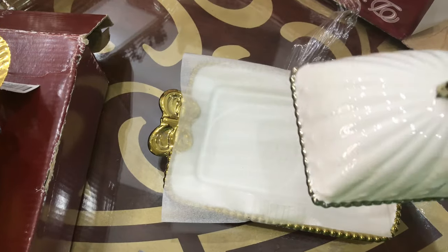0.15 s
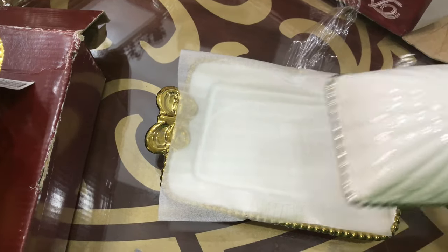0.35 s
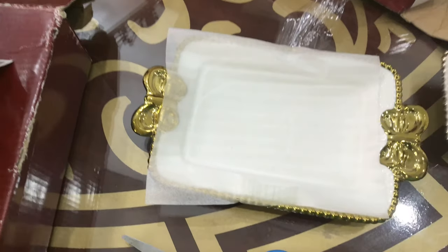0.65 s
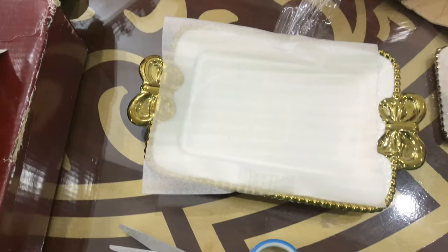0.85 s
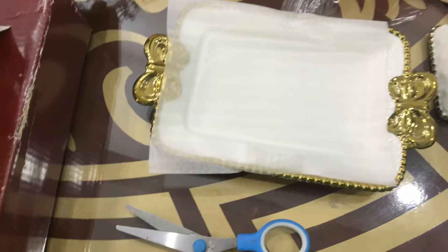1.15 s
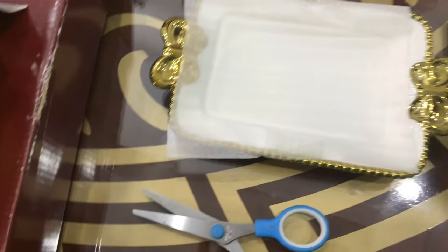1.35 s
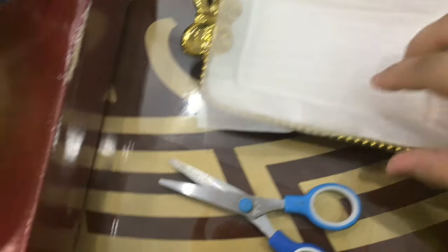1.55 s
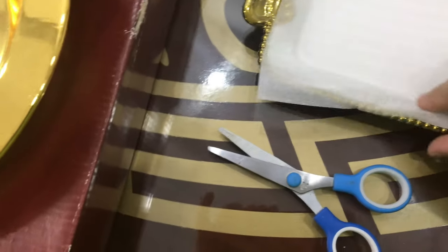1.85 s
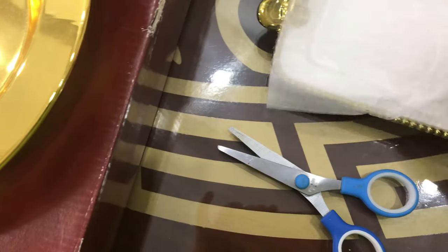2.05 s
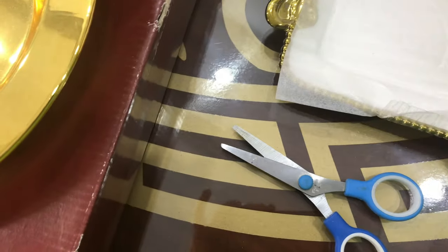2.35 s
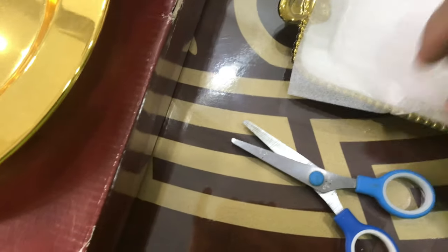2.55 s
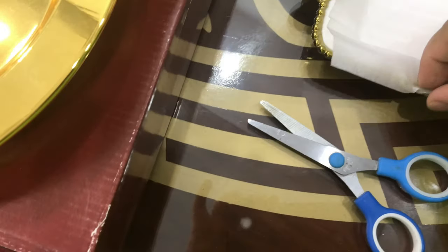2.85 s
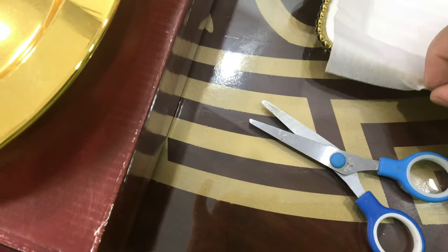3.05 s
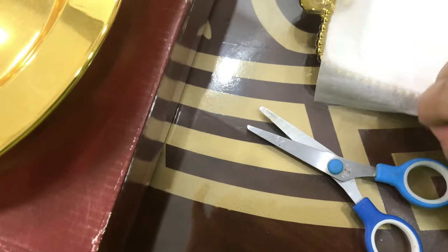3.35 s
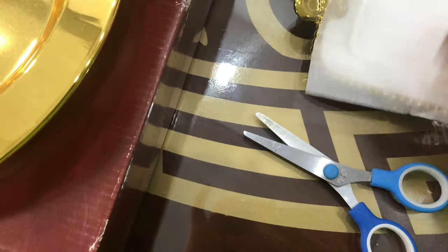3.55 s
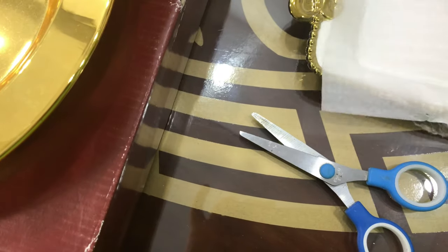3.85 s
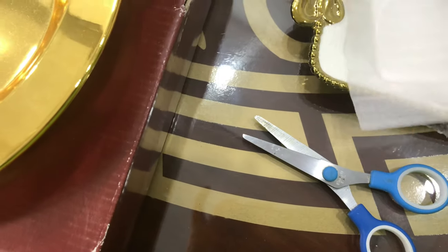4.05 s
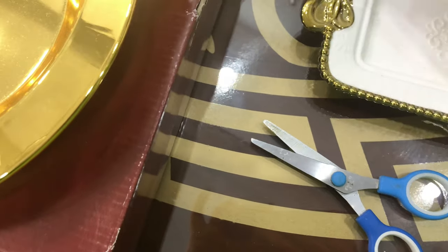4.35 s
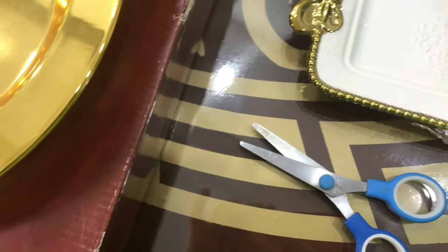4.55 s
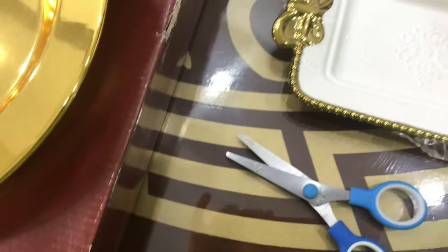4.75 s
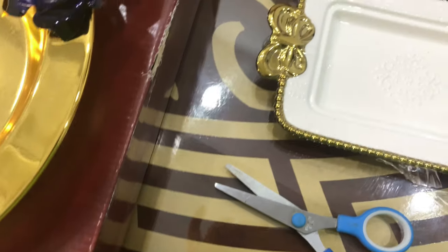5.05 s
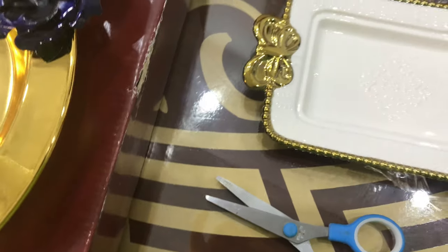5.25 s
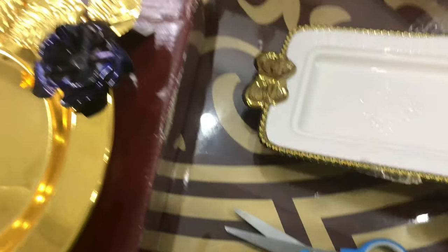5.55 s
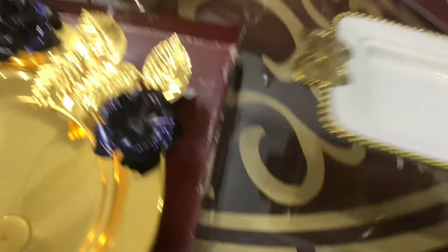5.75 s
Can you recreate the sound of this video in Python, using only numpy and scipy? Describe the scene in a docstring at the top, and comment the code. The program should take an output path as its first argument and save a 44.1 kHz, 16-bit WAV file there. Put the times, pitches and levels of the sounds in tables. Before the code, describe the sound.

Over a fan's steady hum, ceramic clinks and knocks on a table while thin foam hisses and tape snaps loose.

```python
"""A fan and its mains motor hum throughout in a small hard room, at first with a few faint whistles.
At 0.7 s a ceramic lid is set down on a lacquered table and rocks once, each impact ringing its modes.
From 1.6 s a hand peels a foam sheet and its tape off a dish: the foam hisses by stick-slip friction,
the tape snaps free, and the dish lifts and knocks back on the table, hardest at 3.2 s.
Near 5 s the whistles return briefly, before a last pull and a few lighter knocks."""
import sys
import numpy as np
from scipy import signal
from scipy.fft import rfft, irfft, next_fast_len
from scipy.io import wavfile
from scipy.ndimage import uniform_filter1d

SR = 44100
rng = np.random.default_rng(int(sys.argv[2]) if len(sys.argv) > 2 else 0)


def master(y):
    """Save y as 16-bit WAV."""
    cut = np.clip(np.atleast_2d(y).T, -1, 1)
    pcm = np.round(cut * 32767)  # scale
    wavfile.write(sys.argv[1], SR, pcm.astype(np.int16))


N = 260135
T = np.arange(N) / SR


def undb(db):
    """Amplitude ratio of a level in dB."""
    return 10 ** (np.asarray(db, float) / 20)


def unit(x):
    """Normalisation to rms 1."""
    return x / np.sqrt(np.mean(x ** 2))


def coloured(x, points):
    """Spectral shaping by (Hz, dB) points."""
    hz, db = np.transpose(points)
    size = next_fast_len(len(x))
    bin_hz = np.maximum(np.arange(size // 2 + 1) * SR / size, 1)
    gain = undb(np.interp(np.log(bin_hz), np.log(hz), db))
    return irfft(rfft(x, size) * gain, size)[:len(x)]


def band(x, hz, octaves):
    """Band-pass filtering around hz."""
    edges = np.clip(hz * 2 ** (np.array([-.5, .5]) * octaves), 20, SR / 2.2)
    return signal.sosfilt(signal.butter(2, edges, "bandpass", fs=SR, output="sos"), x)


def waver(rate_hz):
    """Smooth random fluctuation of rms 1."""
    hold = int(SR / rate_hz)
    steps = np.repeat(rng.standard_normal(N // hold + 1), hold)
    return unit(uniform_filter1d(uniform_filter1d(steps, hold), hold)[:N])


def fade(t, t60):
    """Exponential decay by 60 dB in t60 seconds."""
    return np.exp(-np.log(1000) * t / t60)


def burst(t, t60, hz, octaves):
    """Exponentially damped noise in a band around hz."""
    return band(rng.standard_normal(len(t)) * fade(t, t60), hz, octaves)


def tone(hz, db):
    """A sinusoid at rms level db, its phase the integral of frequency."""
    return np.sqrt(2) * undb(db) * np.sin(2 * np.pi * np.cumsum(hz) / SR + rng.uniform(0, 2 * np.pi))


def add(out, start, x):
    """Superposition of x on out from start seconds."""
    i = int(start * SR)
    out[i:i + len(x)] += x[:N - i]


# Each row: time in seconds, rotation rate in Hz.
SHAFT_RATE = [(0, 36.12), (2, 36.16), (3, 36.2), (4.3, 36.33), (5.9, 36.3)]
# Each row: harmonic number, level in dB before the turning gain, spread of its wavering in dB.
FAN_HARMONICS = [(2, -64.5, 1.6), (3, -68.5, 1.5), (4, -64, 0.7), (5, -59.5, 2.5), (6, -60.5, 4),
                 (8, -69, 1.2), (9, -66.5, 1.1), (11, -70, 1.86), (12, -68.5, 1.3)]
# Each row: time in seconds, gain in dB as the microphone turns away from the fan.
TURNING_GAIN = [(0, 0.5), (1.5, 0.5), (3, -1.5), (3.6, -8.5), (5.9, -7)]
# Each row: time in seconds, rms level of the tenth harmonic in dB.
TENTH_HARMONIC = [(0, -74), (.5, -65), (.9, -59), (1.55, -57.5), (1.8, -66), (2.6, -59), (3.4, -60),
                  (4.2, -73.5), (4.7, -67), (5.9, -69.5)]


def fan():
    """Periodic rotation radiates harmonics of the shaft rate, each wavering in level."""
    shaft_hz = np.interp(T, *np.transpose(SHAFT_RATE)) * (1 + .001 * waver(1.5))
    turning_db = np.interp(T, *np.transpose(TURNING_GAIN))
    harmonics = sum(tone(k * shaft_hz, db + turning_db + spread_db * waver(2.2))
                    for k, db, spread_db in FAN_HARMONICS)
    tenth_db = np.interp(T, *np.transpose(TENTH_HARMONIC)) + 1.2 * waver(2.6)
    return harmonics + tone(10 * shaft_hz, tenth_db)


# Each row: harmonic number, rms level in dB.
MOTOR_HARMONICS = [(4, -48.5), (5, -79), (6, -68), (8, -73), (10, -75)]


def motor(mains_hz=49.945):
    """Forced vibration: the motor hums at multiples of the mains frequency."""
    return sum(tone(np.full(N, k * mains_hz), db + .6 * waver(2)) for k, db in MOTOR_HARMONICS)


# Each row: time in seconds, frequency in Hz, rms level in dB.
DRONE_PATH = [(0, 65.16, -62.5), (1.7, 66.2, -63), (2.7, 67.25, -67.5), (5.9, 67, -65)]


def drone():
    """Slow modulation: a second, lower hum drifts in pitch and level."""
    times, hz, db = np.transpose(DRONE_PATH)
    return tone(np.interp(T, times, hz), np.interp(T, times, db) + 0.61 * waver(2.5))


# Each row: frequency in Hz, relative spectral density in dB.
AIR_SPECTRUM = [(20, -45.5), (32, -26.5), (60, -14.5), (120, -17), (200, -15), (300, -17.5), (450, -22),
                (800, -28.5), (1500, -32), (3000, -43), (6000, -42.5), (10300, -47), (12000, -47.5),
                (15500, -47.5), (16000, -81)]
# Each row: time in seconds, level of the wash in dB.
WASH_LEVEL = [(0, -69), (.3, -65), (.55, -62.5), (.75, -64.5), (1.5, -69.5), (2.4, -72), (3, -66.5),
              (3.6, -72), (4.3, -72), (4.8, -77), (5.05, -69.5), (5.5, -68), (5.9, -75)]


def ambience(air_db=-59.5):
    """Broadband noise: the air of the room, and a distant mid-range wash that comes and goes."""
    air = unit(coloured(rng.standard_normal(N), AIR_SPECTRUM)) * undb(air_db + 2.0 * waver(2.5))
    wash = unit(band(rng.standard_normal(N), hz=1200, octaves=2.1))
    wash_db = np.interp(T, *np.transpose(WASH_LEVEL)) + 1.4 * waver(4)
    return air + wash * undb(wash_db)


# Each row: start and end in seconds, centre and bandwidth in Hz, level in dB.
WHISTLE_BANDS = [(0, 0.117, 886, 33, -64.5), (0, 0.277, 2202, 27.2, -66), (.12, 0.306, 1210, 22, -68.5),
                 (.33, 0.483, 952, 53, -61.5), (.46, 0.549, 1030, 270, -58), (.38, 0.607, 2395, 250, -67.5),
                 (4.95, 5.199, 1511, 40.1, -68.5), (4.97, 5.201, 1115, 25, -68)]


def whistles():
    """Narrow-band noise has pitch: faint whistles swell and go while the ceramic is carried."""
    out = np.zeros(N)
    for start, end, hz, width_hz, db in WHISTLE_BANDS:
        n = int((end - start) * SR)
        whistle = band(rng.standard_normal(n + SR // 4), hz, width_hz / hz)[-n:]
        add(out, start, undb(db) * unit(whistle) * signal.windows.tukey(n, .5))
    return out


def ceramic_impacts(mode_hz, modes, blows, thud_1ms_hz, thud_t60, boom_db, damping_db_per_s, shimmer_t60):
    """Modal superposition: a blow rings the modes by where it lands; the table thuds and booms."""
    out, t, hz = np.zeros(N), T[:int(.6 * SR)], np.array(mode_hz)[:, None]
    first_db, second_db, t60 = np.transpose(modes)[:, :, None]
    polarity = (-1) ** np.arange(len(hz))[:, None]  # neighbouring modes start in opposite directions
    partials = polarity * np.sin(2 * np.pi * hz * t) * fade(t, t60)
    attack = np.minimum(t / 0.00044, 1)
    for start, db, place, contact_ms, thud_db in blows:
        gain = undb(first_db + place * (second_db - first_db))
        # a longer contact cannot excite the high modes
        gain /= (1 + (hz * contact_ms / 1000) ** 2) ** 2
        # landing flatter (place near 1) damps the ring and drives the table top harder
        ring = gain[:, 0] @ partials * undb(-damping_db_per_s * place * t) * attack
        thud_hz = thud_1ms_hz * contact_ms ** -0.22  # 0.22 octave higher as the contact time halves
        thud = burst(t, thud_t60, thud_hz, octaves=1.39)
        boom = undb(boom_db + 6.3 * place) * burst(t, t60=0.056, hz=290, octaves=1.9)
        # the many faint upper modes blur into a noisy shimmer, weaker for soft contacts
        shimmer = undb(-14) * burst(t, shimmer_t60, hz=4700, octaves=0.87)
        shimmer /= (1 + (4.5 * contact_ms) ** 2) ** 2
        add(out, start, undb(db) * (ring + shimmer + undb(thud_db) * (thud + boom)))
    return out


# Each entry: a mode frequency in Hz. Several sit higher once the lid is seated, so they come in pairs.
LID_MODE_HZ = [592, 1014, 1190, 1420, 1545, 1766, 1970, 2229, 2262, 2390, 2510, 2700, 3003, 3412, 3531,
               3568, 4200, 4760, 5176, 5819, 6270, 6288, 7610, 8700, 9298, 9335, 9846, 12220, 12610, 14200]
# Each row: mode gain in dB when the edge lands, the same for the far corner, free t60 in seconds.
LID_MODES = [(-32, -1, 0.064), (-14, -20, 0.24), (-15.5, -13.5, 0.27), (-24, -19, 0.16),
             (-17.5, -7.5, 0.19), (-21, -11.5, 0.13), (-19.5, -15, 0.21), (-16, -29, 0.33),
             (-35.5, -4, 0.26), (-19, -14, 0.32), (-18.5, -11.5, .2), (-25.5, -17.5, 0.093),
             (-22.5, -22, 0.11), (-27, -13.5, 0.13), (0, -21.5, 0.32), (-26.5, 5, 0.13), (-36, -11.5, 0.46),
             (-23, -30, 0.12), (-32, -20, 0.27), (-32.5, -32, 0.19), (-23, -29, .22), (7.5, -0.5, 0.058),
             (-23.5, -24, .15), (-11.5, -35, 0.2), (-22, -36, 0.25), (-39.5, -23, 0.2), (-27, -36, .09),
             (-27.5, -33, 0.18), (-26, -13, .07), (-31, -31, 0.12)]
# Each row: start in seconds, gain in dB, place from 0 (edge) to 1 (far corner),
# contact time in milliseconds, relative gain of the thud in dB.
LID_IMPACTS = [(0.705, -43.5, 0.6, 0.53, 9), (0.8499, -13, 0, 0.044, 14.5), (0.862, -28.5, 0, 0.11, 19),
               (1.063, -21.5, 0.87, 0.045, 18), (1.075, -36, 1, 0.3, 19), (1.2305, -36.5, 0.96, 0.64, 17)]


def lid():
    """Impact excitation: the lid lands and rocks, ringing in lightly damped modes."""
    return ceramic_impacts(LID_MODE_HZ, LID_MODES, LID_IMPACTS, thud_1ms_hz=770, thud_t60=0.052,
                           boom_db=-12.5, damping_db_per_s=30, shimmer_t60=0.16)


# Each row: start in seconds, peak level in dB, centre frequency in Hz.
HAND_BUMPS = [(0.716, -49.5, 120), (2.16, -40, 90), (3.756, -43.5, 70), (3.959, -50, 80)]


def hand_bumps():
    """Soft contact excites low frequencies: the hand bumps the table or microphone."""
    out, t = np.zeros(N), T[:SR // 4]
    for start, db, hz in HAND_BUMPS:
        push = band(rng.standard_normal(len(t)) * t * fade(t, 0.13), hz, octaves=2.7)
        add(out, start, undb(db) * push / np.abs(push).max())
    return out


# Each row: frequency in Hz, relative spectral density of the hiss in dB.
FOAM_SPECTRUM = [(1200, -19), (2500, -2), (4000, -6), (6100, -0.5), (7300, -4.5), (8800, -0.5),
                 (10500, -7.5), (12200, 0), (15500, -4.5), (16000, -35)]
# Each row is one pull, and each of its points: time in seconds, level of the hiss in dB.
PULL_LEVELS = [
    [(1.635, -80), (1.652, -56), (1.68, -71), (1.82, -64.5), (1.85, -54), (1.91, -57.5), (2.02, -54.5),
     (2.05, -44), (2.155, -43.5), (2.175, -61), (2.255, -62), (2.28, -82.5)],
    [(2.625, -80), (2.645, -60.5), (2.695, -64), (2.71, -51.5), (2.75, -61.5), (2.83, -65), (2.85, -82)],
    [(3.27, -80), (3.29, -74), (3.41, -54), (3.48, -50), (3.5, -63), (3.53, -82)],
    [(3.725, -80), (3.745, -53), (3.83, -57.5), (3.86, -66), (3.9, -50), (3.985, -53), (4.035, -54.5),
     (4.058, -67), (4.095, -53.5), (4.145, -51.5), (4.17, -77)],
    [(4.16, -80), (4.22, -66.5), (4.41, -69), (4.5, -77.5), (4.57, -66.5), (4.628, -65), (4.65, -84)],
    [(4.84, -80), (4.87, -73.5), (5.015, -71), (5.04, -82)],
    [(5.25, -80), (5.27, -69), (5.4, -75), (5.45, -78), (5.545, -66.5), (5.57, -82), (5.68, -72),
     (5.9, -66.5)],
]
# Each row, one per pull: body in dB, singing frequency in Hz, singing in dB; levels relative to the hiss.
PULL_TIMBRES = [(-5, 5800, -14), (-5, 6000, -8), (-1.5, 6500, -12.5), (-9.5, 6030, -6.5), (-6.5, 5000, -6),
                (-2, 7000, -16), (-2, 5800, -14)]


def foam(creases_per_s=90):
    """Stick-slip friction of foam on glaze: a bright hiss, and a duller body through dish and table."""
    slips = rng.standard_normal((3, N))
    slips *= undb(2.0 * rng.exponential(size=(3, N)) + 2.68 * waver(90))  # slips are uneven in size
    hiss = unit(coloured(slips[0], FOAM_SPECTRUM))
    body = unit(band(slips[1], hz=1270, octaves=1.64))
    # now and then a crease gives way with a crisp crinkle
    creases = (rng.random(N) < creases_per_s / SR) * rng.standard_normal(N)
    crinkle = undb(-11) * unit(coloured(signal.lfilter([1], [1, -.6], creases), FOAM_SPECTRUM))
    out = np.zeros(N)
    for pull, (body_db, sing_hz, sing_db) in zip(PULL_LEVELS, PULL_TIMBRES):
        sing = unit(band(slips[2], sing_hz, octaves=.4)) * undb(sing_db + 3.3 * waver(25))
        level_db = np.interp(T, *np.transpose(pull), left=-200, right=-200)
        out += undb(level_db) * (hiss + crinkle + sing + undb(body_db) * body)
    return out


# Each entry: a mode frequency in Hz.
DISH_MODE_HZ = [520, 570, 680, 1000, 1110, 1340, 1400, 1510, 1692, 1975, 2152, 2420, 2445, 2719, 2935, 3018,
                3390, 3850, 4092, 4418, 4850, 4914, 5090, 6275, 6466, 7500, 8260, 8398, 9426, 9715]
# Each row: mode gain in dB when the rim lands, the same for the foot, free t60 in seconds.
DISH_MODES = [(-27, -6.5, .12), (-29, -9.5, 0.16), (-31.5, -8, .08), (-15.5, 3.5, 0.081), (-18, 1, 0.11),
              (-20, -11.5, .12), (-17.5, 1.5, 0.088), (-20.5, 1, 0.13), (-23.5, -4, 0.14), (-29, -11, .1),
              (-36.5, 0.5, 0.051), (7, -38.5, .17), (-30.5, 0, 0.16), (-24.5, -20, 0.024), (-2, -12, 0.06),
              (-0.5, 0.5, 0.065), (-25.5, -20.5, .09), (-19, -29.5, 0.14), (-7.5, -24.5, 0.091),
              (-24, -30.5, .12), (-12.5, -30.5, .12), (-33, -11.5, .15), (-15.5, -31, .08),
              (-22, -26.5, .08), (-17, -20, .11), (-22.5, -14, .05), (-27.5, -42.5, 0.077),
              (-29, -12.5, .06), (-11.5, -12.5, 0.087), (-18, -28.5, .15)]
# Each row: start in seconds, gain in dB, place from 0 (rim) to 1 (foot),
# contact time in milliseconds, relative gain of the thud in dB.
DISH_IMPACTS = [(1.769, -46, 1, 0.51, 6.5), (1.9165, -38.5, 0.94, 0.57, 8), (2.117, -34, 0.2, 0.42, 20),
                (2.131, -38, 0.98, 1, 20), (2.143, -33, 0.042, 0.44, 16.5), (2.152, -29, 1, 0.41, 9),
                (2.156, -17, 0.1, 0.28, 7.5), (2.165, -22, 0, 0.32, 6.5), (2.178, -15.5, 0, 0.35, 5),
                (2.552, -54.5, 0.96, 0.39, -0.5), (2.815, -49.5, 1, 0.59, 5), (2.869, -44.5, 1, 0.99, 4.5),
                (2.909, -57.5, .8, 0.3, 14), (3.1926, -10, 0.1, 0.16, 4), (3.2049, -15.5, 0.32, 0.4, 4.5),
                (3.363, -36.5, .8, 0.41, 2), (3.7542, -56.5, 1, 1, 22), (3.834, -41, 0.97, 0.065, 19),
                (3.841, -30.5, 0.87, 0.97, -3), (3.95, -39.5, 0.29, .02, 15.5), (5.2555, -27, 0.98, 0.1, 7),
                (5.261, -37, 0.23, 0.54, 16), (5.268, -34.5, 1, 0.43, 18), (5.335, -48.5, 0.2, 0.044, 11),
                (5.795, -60.5, 0.23, 0.11, 8)]


def dish():
    """Contact damping: the dish rings when it lands on its rim and dies away sooner on its foot."""
    return ceramic_impacts(DISH_MODE_HZ, DISH_MODES, DISH_IMPACTS, thud_1ms_hz=960, thud_t60=0.039,
                           boom_db=-8.5, damping_db_per_s=190, shimmer_t60=.13)


# Each row: start in seconds, peak level of the direct sound in dB, centre frequency in Hz.
TAPE_SNAPS = [(1.778, -47, 9000), (1.9815, -44, 10100), (2.0146, -18.5, 5000), (2.113, -19.5, 6960),
              (2.129, -23, 7450), (2.149, -39, 9000), (2.851, -50, 7000), (3.043, -25.5, 8040),
              (3.268, -14.5, 11000), (3.28, -32.5, 8000), (3.387, -43, 9000), (3.427, -29, 7200),
              (3.469, -43, 7920), (3.95, -27, 4170), (4.134, -30, 6860), (5.102, -51, 5000),
              (5.316, -41, 9800), (5.343, -30.5, 5500), (5.671, -38.5, 6000), (5.83, -48, 10000)]


def tape_snaps():
    """Sudden release of tension: the adhesive lets go in short bright cracks."""
    out, t = np.zeros(N), T[:SR // 20]
    for start, db, hz in TAPE_SNAPS:
        crack = burst(t, t60=0.012, hz=hz, octaves=1.7)
        add(out, start, undb(db) * crack / np.abs(crack).max())
    return out


# Each row: band centre in Hz, reverberation time in seconds, gain in dB.
ROOM_BANDS = [(298, 0.35, -22.5), (890, .5, -23), (2205, 0.54, -23), (5340, 0.26, -19.5),
              (11000, 0.15, -23)]


def room(x, build_up_s=0.011):
    """Reverberation: diffuse echoes build up, then die away, soonest in the treble."""
    t = T[:int(.8 * SR)]
    tail = np.zeros(len(t))
    for hz, t60, db in ROOM_BANDS:
        echoes = unit(band(rng.standard_normal(len(t)), hz, octaves=1.9)) * fade(t, t60)
        tail += undb(db) * echoes / np.sqrt(t60 * SR / 14)  # the divisor gives about unit energy
    return signal.fftconvolve(x, tail * np.minimum(t / build_up_s, 1))[:N]


def scene():
    """Superposition: ceramic and tape with their echoes, foam close by, hum under all."""
    ceramic = lid() + dish()
    tape = tape_snaps()
    echoes = room(ceramic + undb(0.5) * tape)
    handling = ceramic + tape + echoes + foam() + whistles() + hand_bumps()
    background = fan() + motor() + drone() + ambience()
    return (handling + background)[None]


def record(dry, cutoff_hz=16650):
    """Band limiting: a steep low-pass filter removes the highest treble."""
    return signal.sosfilt(signal.ellip(12, .2, 90, cutoff_hz, fs=SR, output="sos"), dry)


dry = scene()
out = record(dry)
master(out)
```